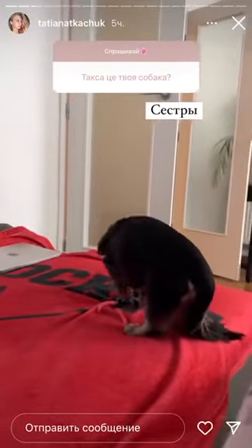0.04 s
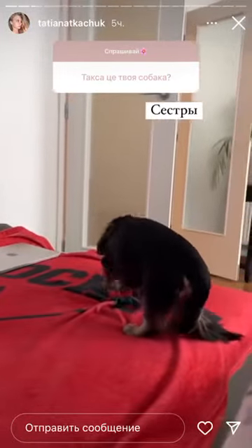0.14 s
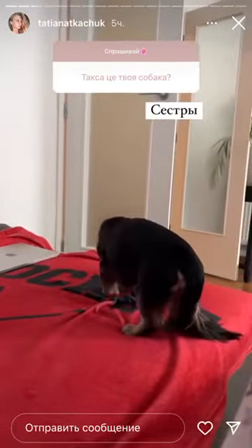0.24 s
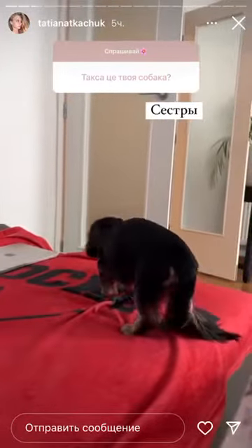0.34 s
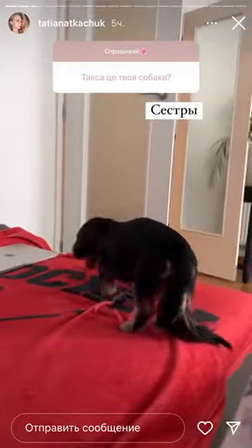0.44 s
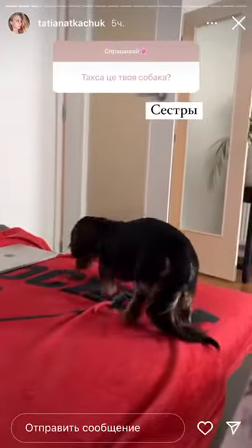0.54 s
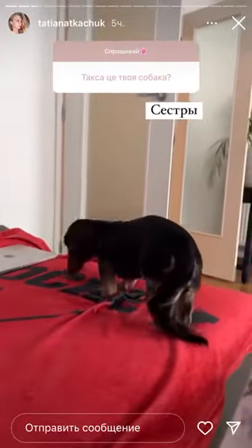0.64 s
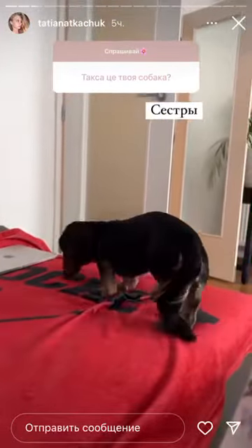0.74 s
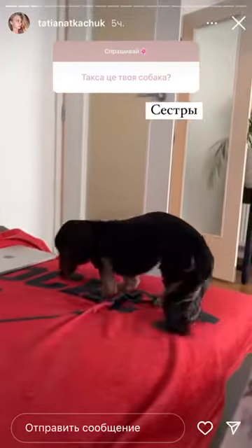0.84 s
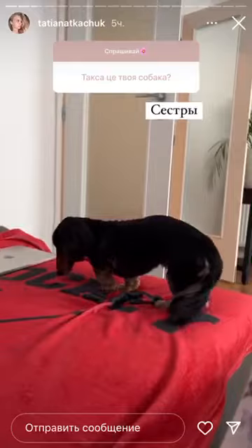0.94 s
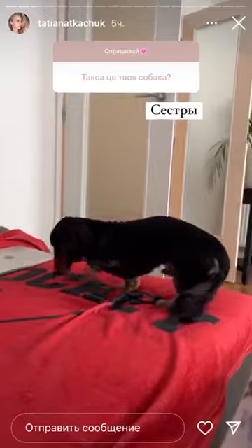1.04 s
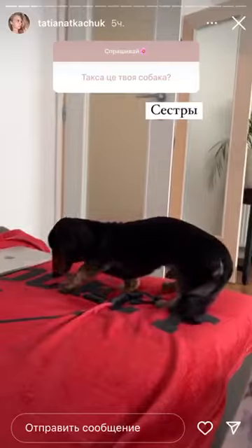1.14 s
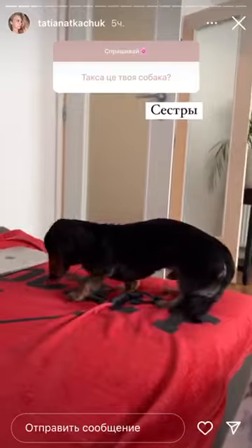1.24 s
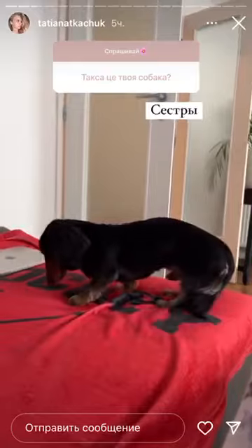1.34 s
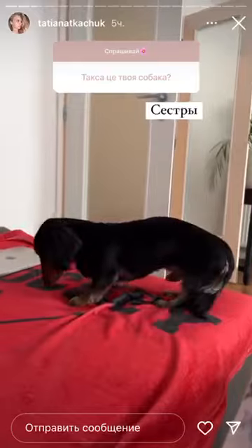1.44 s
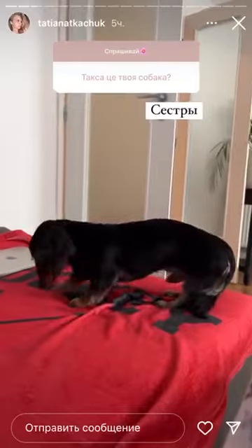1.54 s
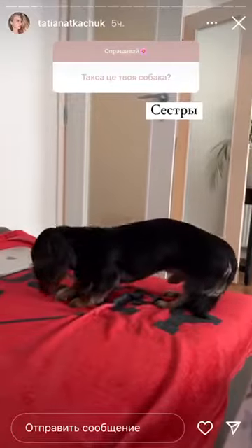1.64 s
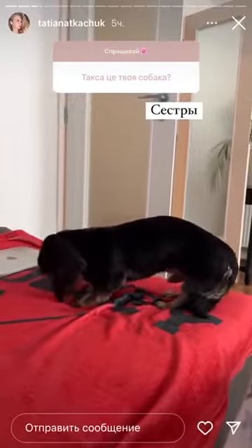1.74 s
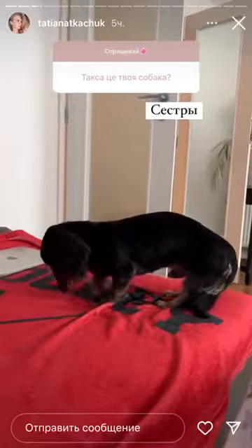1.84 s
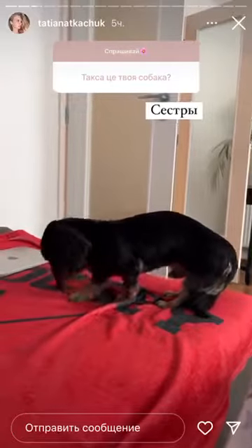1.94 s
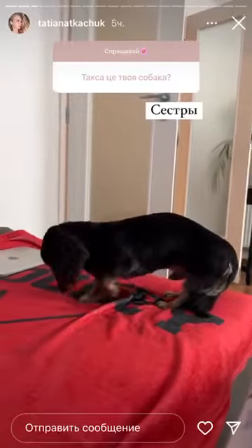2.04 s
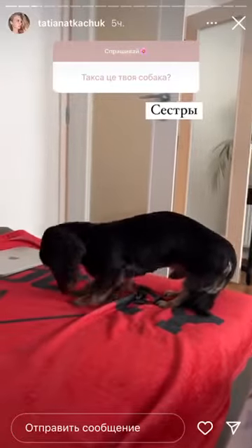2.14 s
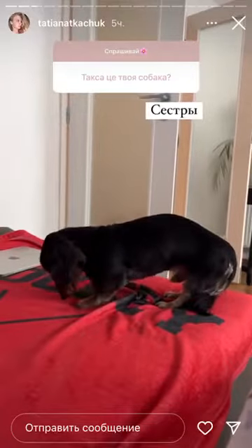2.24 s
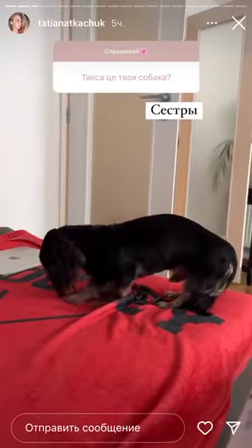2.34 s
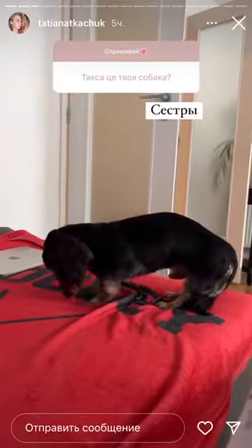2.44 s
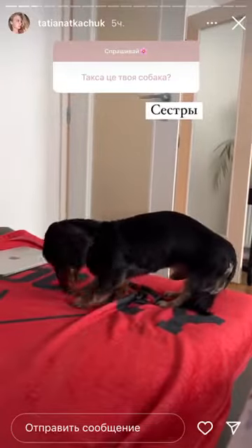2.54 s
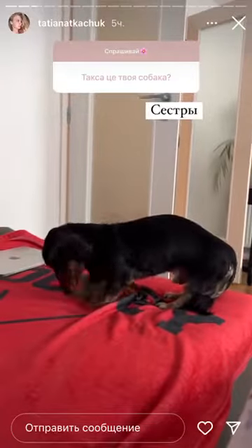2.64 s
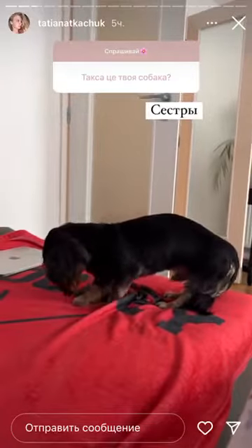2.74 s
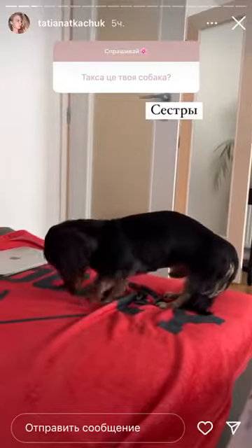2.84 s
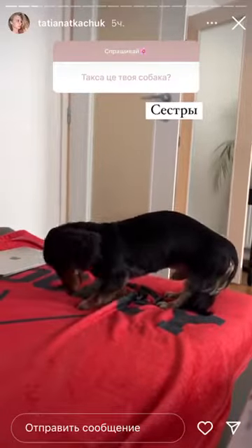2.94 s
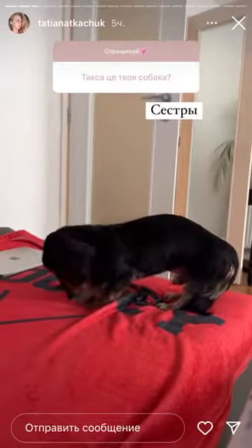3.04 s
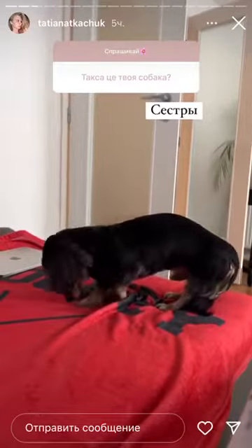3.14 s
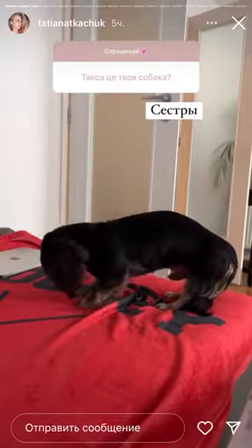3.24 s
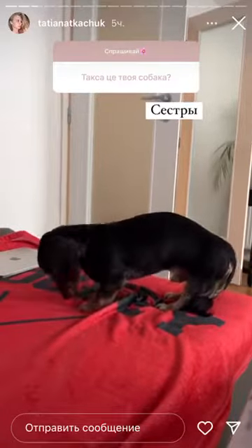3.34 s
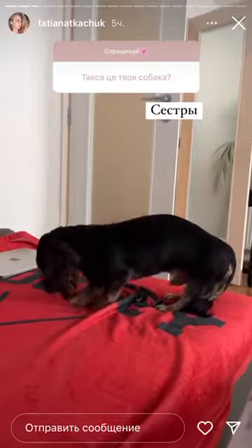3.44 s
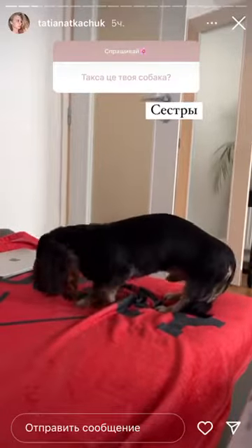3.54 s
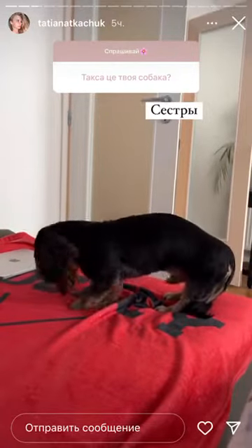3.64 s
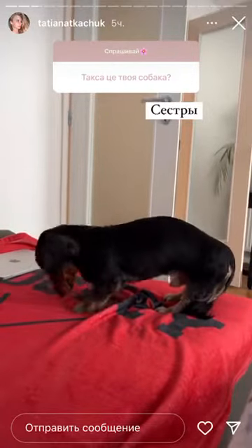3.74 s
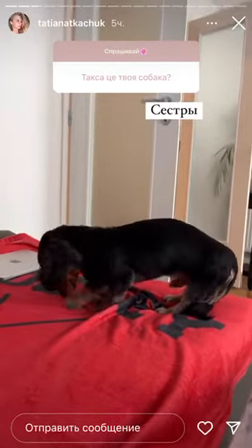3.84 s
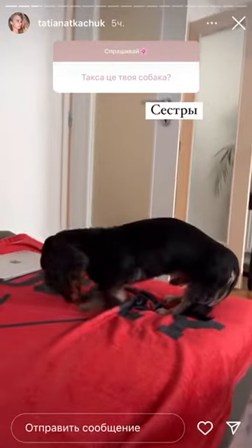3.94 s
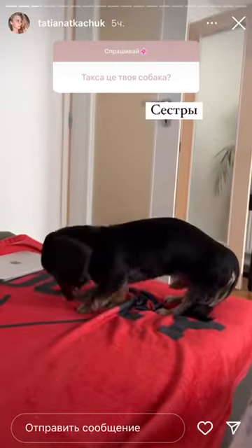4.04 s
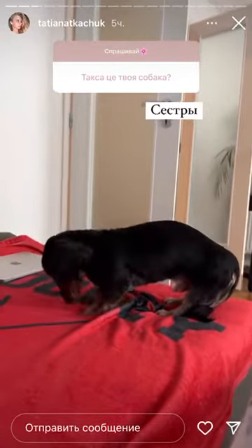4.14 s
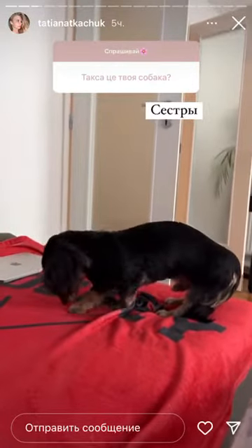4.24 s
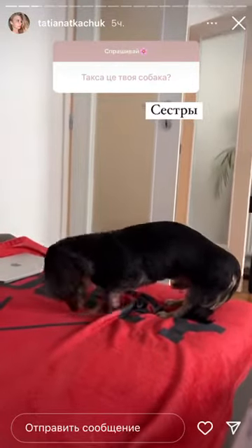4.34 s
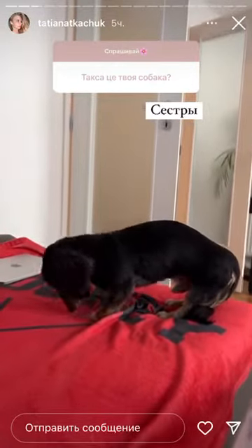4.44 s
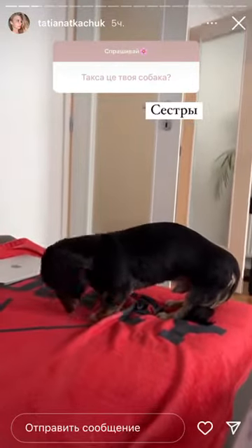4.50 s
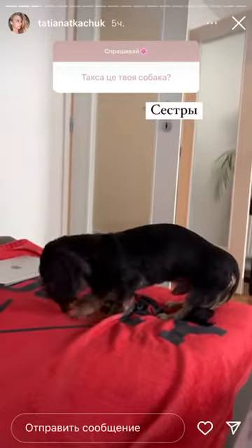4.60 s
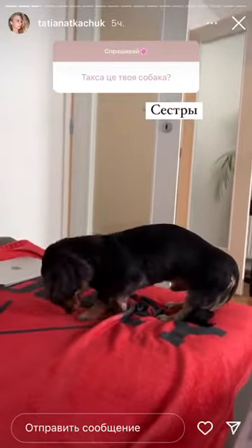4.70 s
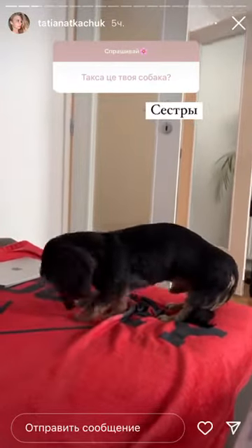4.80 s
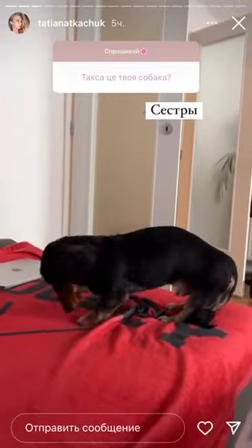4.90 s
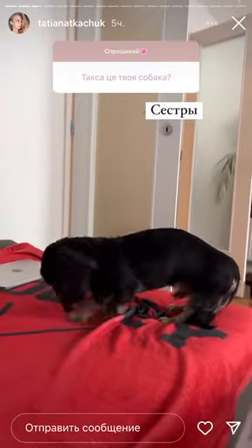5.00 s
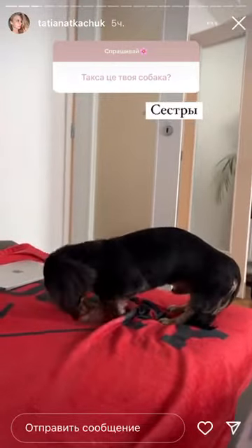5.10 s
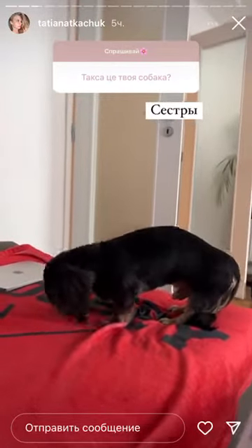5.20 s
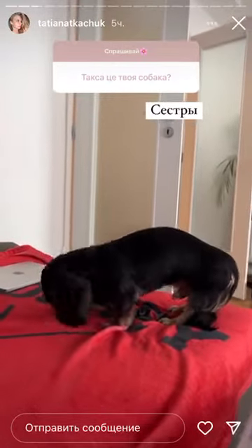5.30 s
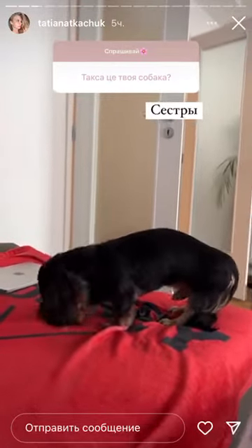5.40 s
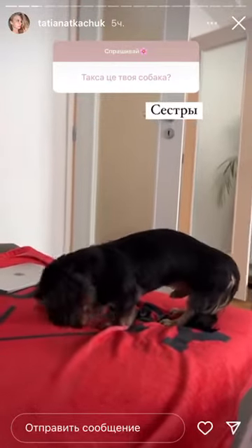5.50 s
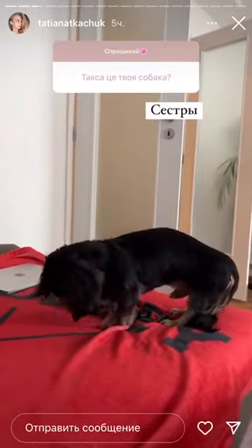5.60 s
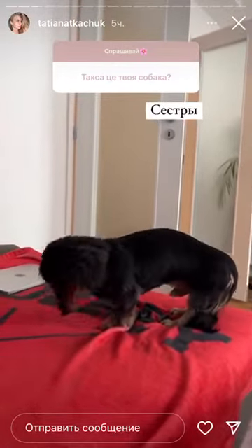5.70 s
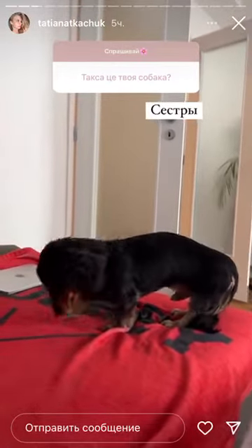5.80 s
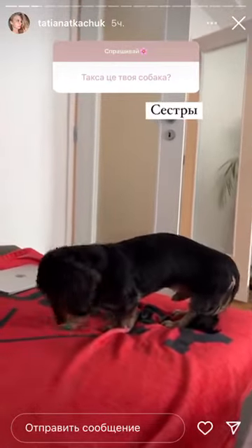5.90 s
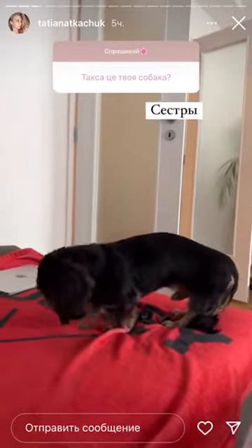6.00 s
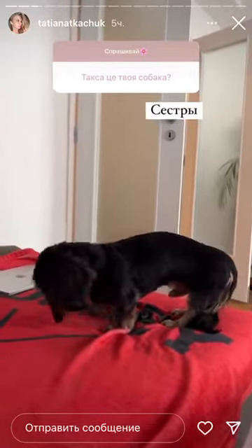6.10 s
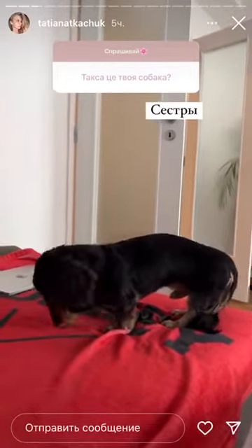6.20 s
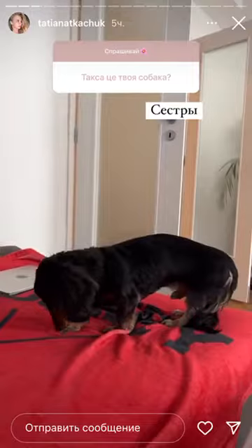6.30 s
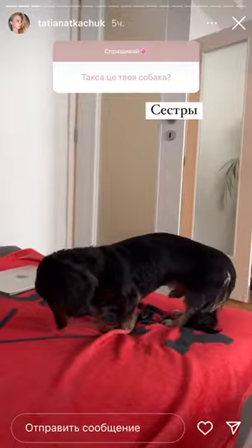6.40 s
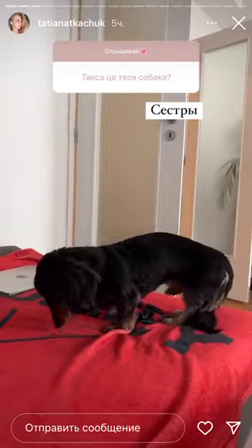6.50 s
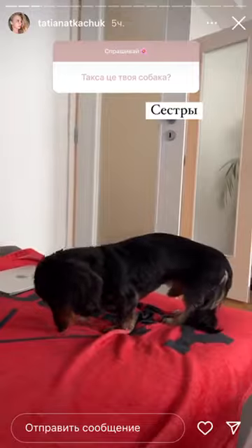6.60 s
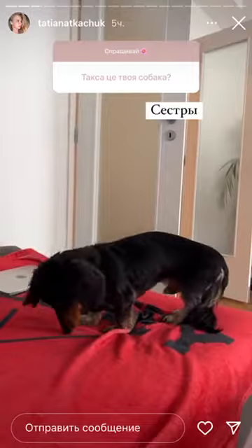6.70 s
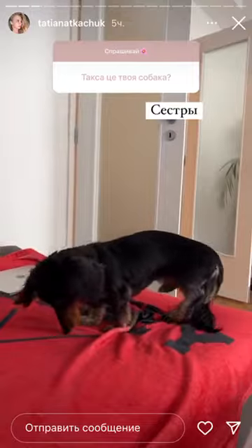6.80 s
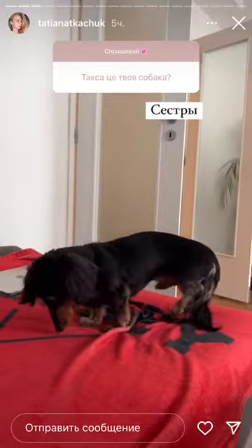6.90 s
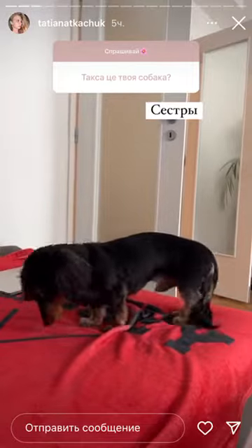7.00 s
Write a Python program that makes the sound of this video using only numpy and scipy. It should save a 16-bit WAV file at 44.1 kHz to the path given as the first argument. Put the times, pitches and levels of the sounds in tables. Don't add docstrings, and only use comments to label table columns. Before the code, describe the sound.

A small dog digs fast at a padded blanket on a bed, claws scraping and tugging cloth, mattress thudding, then slows to shuffles.

```python
import sys
import numpy as np
from scipy import signal
from scipy.fft import rfft, irfft, next_fast_len
from scipy.io import wavfile
from scipy.ndimage import uniform_filter1d

SR = 44100
rng = np.random.default_rng(int(sys.argv[2]) if len(sys.argv) > 2 else 0)


def dump_mix(stems):
    frames = np.atleast_2d(stems).T
    limited = np.clip(frames, -1, 1)
    pcm = np.round(limited * 32767).astype(np.int16)
    wavfile.write(sys.argv[1], SR, pcm)


def boost(x):
    u = np.asarray(x, float) / 20
    return 10 ** u


N = 310989
TREBLE_EDGE_HZ = 11000


def rms_one(x):
    return x / np.sqrt(np.mean(x ** 2) + 1e-20)


def low_pass(x, hz):
    return signal.sosfilt(signal.ellip(8, .5, 70, hz, fs=SR, output="sos"), x)


def band_pass(x, order, low_hz, high_hz):
    return signal.sosfilt(signal.butter(order, [low_hz, high_hz], "band", fs=SR, output="sos"), x)


def high_pass(x, order, hz):
    return signal.sosfilt(signal.butter(order, hz, "high", fs=SR, output="sos"), x)


def drift(rate):
    r = np.exp(-80 * np.pi * rate / SR)
    noise = rng.standard_normal(N // 40 + 2002)
    slow = signal.lfilter([1], [1, -2 * r, r * r], noise)[2000:]
    return np.interp(np.arange(N) / 40, np.arange(len(slow)), rms_one(slow))


def ring(x, hz, t60):
    r, w = boost(-60 / (t60 * SR)), 2 * np.pi * hz / SR
    return signal.lfilter([0, np.sin(w)], [1, -2 * r * np.cos(w), r * r], x + 1e-18)


def bed_mode(x, hz, width_hz, level_db):
    return boost(level_db) * rms_one(ring(x, hz, t60=np.log(1000) / np.pi / width_hz))


def moving_ring(x, centre_hz, width_hz):
    out, state, r = np.zeros(N), np.zeros(2), np.exp(-np.pi * width_hz / SR)
    gain = [(1 - r * r) / 2, 0, (r * r - 1) / 2]
    for i in range(0, N, 400):
        poles = [1, -2 * r * np.cos(2 * np.pi * centre_hz[i] / SR), r * r]
        out[i:i + 400], state = signal.lfilter(gain, poles, x[i:i + 400], zi=state)
    return out


def slips(per_s, spread_db):
    heights = boost(spread_db * np.minimum(rng.exponential(1, (2, N)), 4))
    signs = rng.choice([-1, 1], (2, N))
    return rms_one(heights * signs * (rng.random((2, N)) < per_s / SR))


def coloured(pair, spectrum, patchy_db, patch_rate):
    hz, db = np.transpose(spectrum)
    edges = np.geomspace(hz[0], hz[-1], round(3 * np.log2(hz[-1] / hz[0])) + 1)
    out = np.zeros(N)
    for k, (low, high) in enumerate(zip(edges, edges[1:])):
        level_db = np.interp(np.log(low * high) / 2, np.log(hz), db)
        flicker = drift(patch_rate)
        if level_db > -60 and low > 17:
            out += band_pass(pair[k % 2], 2, low, high) * boost(level_db + patchy_db * flicker)
    return rms_one(out)


def blows(rows):
    s, db = np.transpose(rows)
    clicks = np.zeros(N)
    clicks[np.round(s * SR).astype(int)] = boost(db)
    return clicks


def slopes(s, rise, fall):
    after = np.arange(0, N / SR + .01, .005) - np.asarray(s)[:, None]
    return np.minimum(rise * after, -fall * after)


def peaks(rows, rise, fall, gain_db):
    s, db = np.transpose(rows)
    return (db + gain_db)[:, None] + slopes(s, rise, fall)


def joined(*rows_db, idle_db):
    power = np.sum(boost(2 * np.vstack(rows_db)), axis=0) + boost(2 * idle_db)
    return np.interp(np.arange(N) / SR, np.arange(len(power)) * .005, 10 * np.log10(power))


# pitch_hz [Hz], level_db [dB per Hz]
ROOM_RUMBLE = [(13, -33), (22, 0), (49, 2), (76, -1.5), (215, -11), (489, -30), (661, -27), (779, -43),
               (970, -27), (5030, -42.5), (6440, -41.5), (15500, -51.5)]


def room_hush():
    return boost(-28.5) * coloured(rng.standard_normal((2, N)), ROOM_RUMBLE, patchy_db=.7, patch_rate=5.)


def microphone_hiss():
    return boost(-52) * high_pass(rng.standard_normal(N), 4, 10500)


# start_s [s], level_db [dB peak]
PAW_STEPS = [
    (0.137, -24),
    (1.009, -23),
    (1.382, -25),
    (6.5, -25.5),
    (6.715, -20),
    (6.881, -22),
]


def pats():
    soft = signal.sosfilt(signal.butter(2, 500, fs=SR, output="sos"), blows(PAW_STEPS))
    return 1.2 * ring(soft, hz=194, t60=0.075) + 1.04 * ring(soft, hz=286, t60=0.065)


# start_s [s], firmest_after_s [s], lifted_after_s [s], speed_db [dB], pressure_db [dB]
DIG_STROKES = [(1.518, 0.011, 0.054, -34.4, -11), (1.593, 0.027, 0.13, -32.5, -15.5),
               (1.847, 0.058, 0.096, -28.0, -7.5), (2.062, 0.065, 0.079, -30.0, -9.5),
               (2.198, 0.059, 0.116, -29.0, -9.9), (2.42, 0.066, 0.084, -30.5, -10.5),
               (2.559, 0.068, 0.099, -29.5, -9), (2.816, 0.071, 0.058, -30.0, -11.0),
               (2.945, 0.07, 0.103, -31, -12), (3.209, 0.068, 0.051, -30, -14.5),
               (3.355, 0.044, 0.1, -32.0, -12), (3.577, 0.088, 0.091, -28.5, -11),
               (3.713, 0.073, 0.14, -32, -10.5), (3.952, 0.06, 0.075, -29.8, -10.1),
               (4.097, 0.076, 0.11, -30.5, -10.5), (4.35, 0.05, 0.05, -30.5, -14),
               (4.47, 0.075, 0.11, -31, -11.4), (4.713, 0.044, 0.076, -30.2, -12),
               (4.858, 0.106, 0.086, -32.5, -11), (5.3, 0.068, 0.1, -36, -10.5)]
# start_s [s], firmest_after_s [s], lifted_after_s [s], speed_db [dB],
# pressure_db [dB]
SLOW_DRAGS = [
    (0.603, 0.08, 0.124, -48, -35.5),
    (0.997, 0.092, 0.129, -50, -35.5),
    (1.486, 0.037, 0.012, -36.5, -17),
    (5.735, 0.072, 0.073, -33.5, -11),
    (6.101, 0.066, 0.077, -35, -12.5),
    (6.33, 0.032, 0.06, -59, -38.5),
    (0.14, 0.04, 0.074, -52, -38),
    (0.375, 0.008, 0.045, -51, -34),
    (1.235, 0.03, 0.06, -58, -41),
]


def strokes(answer, press_share, gain_db):
    lag, dig, drag, swell, sag, release = answer
    s, firmest, lifted, speed_db, press_db = np.transpose(DIG_STROKES + SLOW_DRAGS)
    landing = np.repeat([dig, drag], [len(DIG_STROKES), len(SLOW_DRAGS)])[:, None]
    db = gain_db + speed_db + press_share * (press_db - speed_db)
    s = s + lag
    shape = slopes(s, landing, 0) + slopes(s + firmest, swell, sag) + slopes(s + lifted, 0, release)
    return db[:, None] + shape


# pitch_hz [Hz], level_db [dB per Hz]
FIBRE_SPECTRUM = [(1350, -7), (2300, 1), (2520, -3.5), (3320, -4.5), (4350, -2), (5270, -6.5), (5920, -3),
                  (7510, -11), (9590, -14.5), (10700, -16), (13900, -34), (22000, -120)]
# lag_s [s], then dig landing, drag landing, swell, sag, release [dB per s]
FIBRE_RESPONSE = (0.0031, 525, 174, 36, 36, 208)


def fibres():
    level_db = joined(strokes(FIBRE_RESPONSE, press_share=0, gain_db=2.5), idle_db=-52.5)
    grain = slips(per_s=9000., spread_db=2.5)
    hiss = low_pass(coloured(grain, FIBRE_SPECTRUM, patchy_db=1.5, patch_rate=10.0), TREBLE_EDGE_HZ)
    trace = band_pass(grain[1], 3, 10800, 13200)
    return boost(level_db) * (hiss + boost(-24.5) * trace)


# pitch_hz [Hz], level_db [dB per Hz]
CLAW_SPECTRUM = [(350, -11), (600, -1.5), (666, -12), (712, 0.5), (922, -6), (1090, -7.5), (2030, -16),
                 (2600, -44.5), (3380, -48), (5720, -120)]


def claws(level_db):
    jumps = slips(per_s=4000., spread_db=2.0) * boost(1.2 * drift(40.))
    return boost(level_db) * low_pass(coloured(jumps, CLAW_SPECTRUM, patchy_db=2.5, patch_rate=12.4), 2400)


# lag_s [s], then dig landing, drag landing, swell, sag, release [dB per s]
COVER_RESPONSE = (0.0027, 350, 220, 59, 15, 243)


def cover_presses():
    return strokes(COVER_RESPONSE, press_share=1, gain_db=1.5)


# pitch_hz [Hz], level_db [dB per Hz]
COVER_SPECTRUM = [(65, -13.5), (110, -10), (193, 1.5), (279, -5.5), (440, -11), (482, -10), (618, -12.5),
                  (800, -20.5), (1040, -17), (1760, -120)]
# pitch_hz [Hz], width_hz [Hz], level_db [dB]
BED_RESONANCES = [(63.8, 6.4, -11.5), (205.2, 7.3, -15), (339.5, 9.5, -20), (450.2, 24.6, -3.5),
                  (610, 82, -16)]


def cover(level_db, taut_hz):
    snags = slips(per_s=2000., spread_db=2.5) * boost(level_db + 1.74 * drift(37.0))
    strength = np.sqrt(np.mean(boost(level_db) ** 2))
    shaken = coloured(snags, COVER_SPECTRUM, patchy_db=2.5, patch_rate=6.5)
    modes = sum(bed_mode(snags[0], *row) for row in BED_RESONANCES[1:])
    cloth = rms_one(moving_ring(snags[1], taut_hz, width_hz=62.0))
    return strength * rms_one(shaken + 0.55 * modes + 0.34 * cloth)


# start_s [s], level_db [dB peak]
KNOCK_TOUCHES = [
    (0.3706, -22),
    (0.3722, -24),
    (0.3737, -5),
]
# pitch_hz [Hz], level_db [dB], t60_s [s]
KNOCK_RINGS = [(610, 6.5, 0.028), (940, 0.5, 0.023), (1710, -13, .012), (2150, -18, 0.015),
               (1310, -17, 0.012), (816, 4.5, 0.022)]


def knock():
    soft = low_pass(high_pass(-blows(KNOCK_TOUCHES), 3, 350), 2260)
    return sum(boost(db - 8.5) * ring(soft, hz, t60) for hz, db, t60 in KNOCK_RINGS)


# start_s [s], end_s [s], pitch_hz [Hz], level_db [dB]
SPRING_HUMS = [
    (0.63, 0.77, 410, -44),
    (5.44, 5.66, 410, -42),
    (5.5, 5.6, 208, -38),
    (6.26, 6.5, 210, -32),
    (6.95, 7.05, 405, -45),
]


def spring():
    t, out = np.arange(N) / SR, np.zeros(N)
    for start, end, hz, db in SPRING_HUMS:
        swell = np.clip(np.minimum(t - start, end - t) / .03, 0, 1) * boost(db + 2 * drift(8.))
        turns = np.cumsum(hz * (1 + 0.0046 * drift(6.2))) / SR
        out += np.sqrt(2) * swell * np.sin(2 * np.pi * turns)
    return out


# start_s [s], level_db [dB]
WEIGHT_DROPS = [(0.676, -18.2), (1.011, -28.5), (1.283, -24), (1.633, -13.5), (1.719, -13.4),
                (1.964, -10.5), (2.141, -14), (2.231, -20), (2.358, -10), (2.499, -13), (2.875, -15.0),
                (3.057, -19), (3.261, -12.2), (3.406, -12), (3.683, -12), (3.905, -16.1), (4.036, -13.2),
                (4.236, -15.5), (4.413, -9.9), (4.603, -14), (4.807, -12), (5.016, -16), (5.401, -15.1),
                (5.846, -17.5), (6.032, -26.5), (6.209, -20.5), (6.349, -22.5), (6.522, -23.5),
                (6.803, -21), (7.039, -29)]


def pushes():
    return peaks(WEIGHT_DROPS, rise=168, fall=155, gain_db=1.45)


# pitch_hz [Hz], level_db [dB per Hz]
MATTRESS_SPECTRUM = [(13, -36), (22, -5), (54, 11), (129, 2.5), (170, -10), (220, 2.5), (370, -120)]


def mattress(level_db):
    push = rng.standard_normal((2, N))
    thud = coloured(push, MATTRESS_SPECTRUM, patchy_db=3.0, patch_rate=4.2)
    return boost(level_db) * rms_one(thud + bed_mode(push[0], *BED_RESONANCES[0]))


# start_s [s], level_db [dB]
CLAW_TUGS = [(1.542, -16), (1.914, -12), (2.113, -11), (2.218, -14.9), (2.494, -13.5), (2.571, -14),
             (2.635, -14), (2.88, -17), (3.007, -11.5), (3.651, -13.3), (3.732, -17.5), (4.0, -9.5),
             (4.181, -16), (4.395, -16), (4.544, -13), (4.785, -18), (5.37, -15), (5.796, -11.1),
             (6.163, -15.5)]
# lag_s [s], then dig landing, drag landing, swell, sag, release [dB per s]
CLAW_RESPONSE = (-0.01, 418, 200, 89, 93, 177)


def claw_level():
    tugged = peaks(np.add(CLAW_TUGS, [.006, 0]), rise=400, fall=440, gain_db=-0.16)
    return joined(strokes(CLAW_RESPONSE, press_share=0.87, gain_db=-3.8), tugged, idle_db=-51)


def tautness(claw_db):
    return 328 + 220 * boost(claw_db - claw_db.max()) + 45 * drift(9.1)


# start_s [s], level_db [dB]
COVER_JOLTS = [(1.551, -8), (1.696, -10.5), (1.923, -7.1), (2.145, -5), (2.277, -9.5), (2.522, -10.5),
               (2.662, -7.5), (2.884, -12), (2.971, -11.0), (3.043, -12), (3.261, -11.7), (3.438, -9.5),
               (3.669, -10), (3.823, -7.5), (4.032, -5.4), (4.195, -6.9), (4.395, -10.5), (4.58, -8.5),
               (4.789, -10), (5.32, -11), (5.388, -8.5), (5.787, -9.4), (6.168, -12)]


def jolts():
    return peaks(COVER_JOLTS, rise=350, fall=450, gain_db=0.1)


# start_s [s], level_db [dB peak]
THREAD_SNAPS = [
    (1.6109, -32),
    (3.2032, -30),
    (3.3574, -37),
    (3.5694, -37),
    (3.7802, -19),
    (4.4679, -34),
    (4.7068, -31),
    (4.9109, -24),
]


def snaps():
    clicks = blows(THREAD_SNAPS)
    tick = ring(clicks, hz=9000, t60=.004) + .7 * ring(clicks, hz=10400, t60=.004)
    return boost(4.5) * band_pass(tick, 3, 8000, 11500)


# start_s [s], level_db [dB peak], dying_s [s]
CLAW_BITES = [(1.834, -17, 0.25), (1.873, -14, 0.25), (2.108, -9, 0.23), (3.193, -10.5, 0.34),
              (3.355, -8.5, 0.19), (3.587, -9.5, 0.23), (3.991, -13, 0.25), (4.338, -10, 0.28),
              (4.692, -12, 0.35), (5.293, -10.5, 0.24), (6.011, -19, 0.53)]


def bites():
    swell, after = np.zeros(N), np.arange(SR // 2) / SR
    for s, db, dying in CLAW_BITES:
        at = round(s * SR)
        burst = boost(db - 12 - 60 * after / dying) * np.minimum(after / .002, 1)
        swell[at:at + len(after)] += burst[:N - at]
    scuff = high_pass(slips(per_s=6000., spread_db=2.5)[0], 4, 900)
    return swell * rms_one(low_pass(signal.lfilter([.2], [1, -.8], scuff), 2250))


def bedroom(x):
    t60_s, wall_cut_hz = 0.37, 10500
    size = next_fast_len(N + SR)
    hz = np.arange(size // 2 + 1) * SR / size
    lags_s = np.array([17.3, 19.9, 23.1, 26.3, 29.9, 33.7, 37.1, 41.3]) / 1000
    reply = 0
    for k, lag in enumerate(lags_s):
        loop = boost(-60 * lag / t60_s) / (1 + 1j * hz / wall_cut_hz) * np.exp(-2j * np.pi * hz * lag)
        reply = reply + (-1) ** k * loop / (1 - loop)
    return irfft(rfft(x, size) * reply, size)[:N]


def scene():
    pressed = cover_presses()
    cover_db = joined(pressed, jolts(), idle_db=-41)
    claw_db = claw_level()
    thud_db = joined(pushes(), pressed - 10, idle_db=-33.5)
    on_the_cloth = pats() + fibres() + claws(claw_db) + cover(cover_db, tautness(claw_db))
    near = on_the_cloth + knock() + snaps() + bites()
    echoed = near + boost(-24) * bedroom(near)
    return (room_hush() + microphone_hiss() + echoed + spring() + mattress(thud_db))[None]


def speckle(x, contrast, start_hz, starved, hole_db):
    hz, _, lines = signal.stft(x, SR, nperseg=2048, noverlap=1024)
    local = uniform_filter1d(np.abs(lines) ** 2, size=24, axis=-2)
    ratio = np.abs(lines) ** 2 / (local + 1e-30)
    treble = np.clip(hz / start_hz - .5, 0, 1)[:, None]
    depth = np.where(hz < TREBLE_EDGE_HZ, 1, .2)[:, None]
    thinned = lines * np.minimum(ratio, 5) ** (contrast * depth * (.4 + .6 * treble))
    kept = uniform_filter1d(np.abs(thinned) ** 2, size=24, axis=-2)
    thinned *= np.sqrt(local / (kept + 1e-30))
    luck = np.repeat(rng.standard_normal(lines.shape)[:, ::5], 5, axis=-2)[:, :len(hz)]
    luck = rms_one(uniform_filter1d(luck, size=5, axis=-1))
    change_db = depth * treble * (1.23 * luck + hole_db * (luck < starved))
    thinned *= boost(change_db - 3.2 * (hz >= TREBLE_EDGE_HZ)[:, None])
    return signal.istft(thinned, SR, nperseg=2048, noverlap=1024)[1][..., :N]


def top_cut(x):
    return signal.sosfilt(signal.butter(12, 16880, fs=SR, output="sos"), x)


def record(dry):
    rounded = dry / (1 + np.abs(dry / 1.15) ** 5) ** .2
    speckled = speckle(rounded, contrast=.36, start_hz=2200., starved=-1.35, hole_db=-30)
    mix = low_pass(speckled, 15800)
    return top_cut(mix)


dry = scene()
out = record(dry)
dump_mix(out)
```